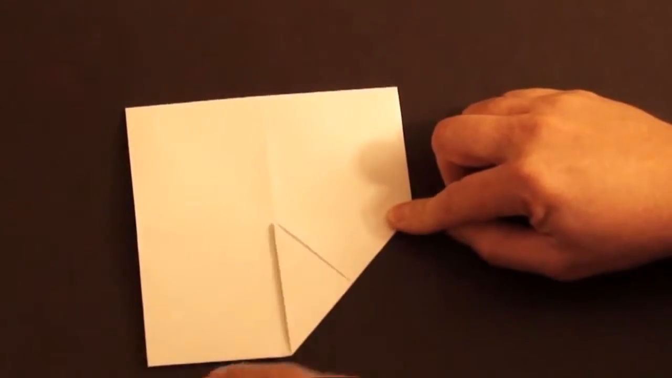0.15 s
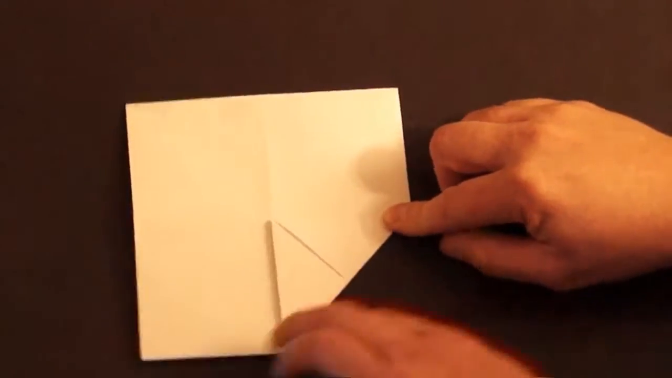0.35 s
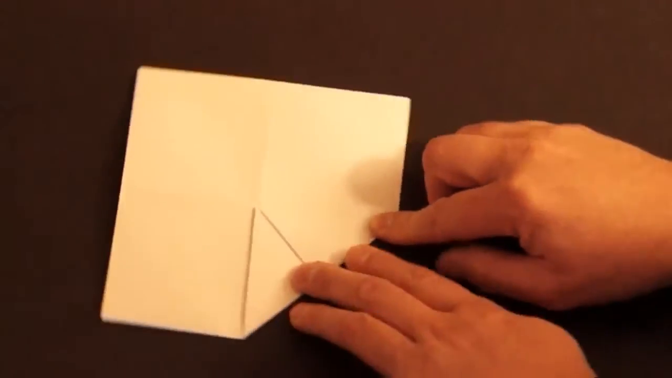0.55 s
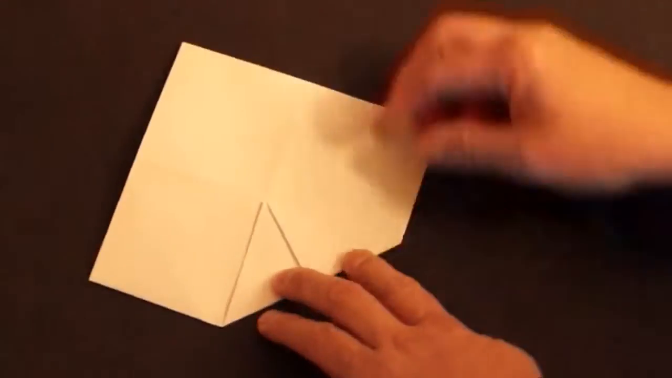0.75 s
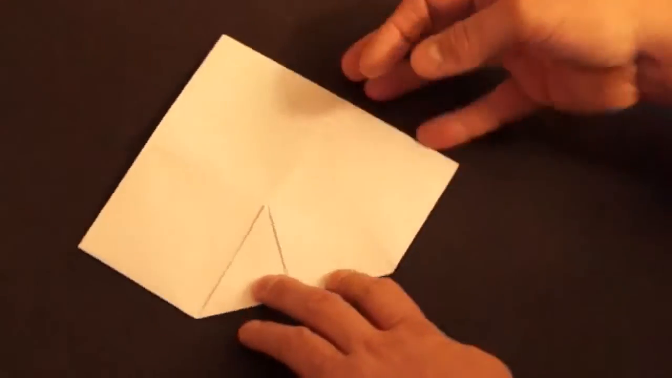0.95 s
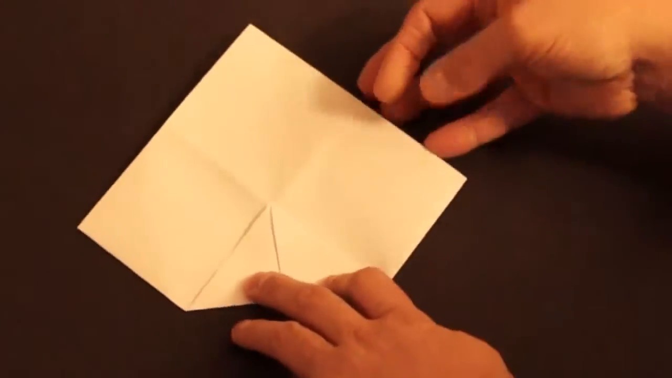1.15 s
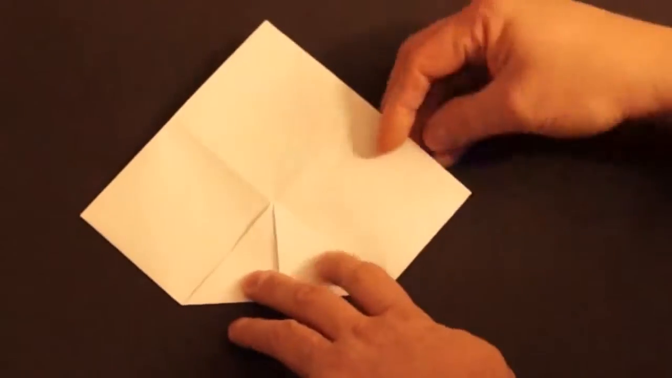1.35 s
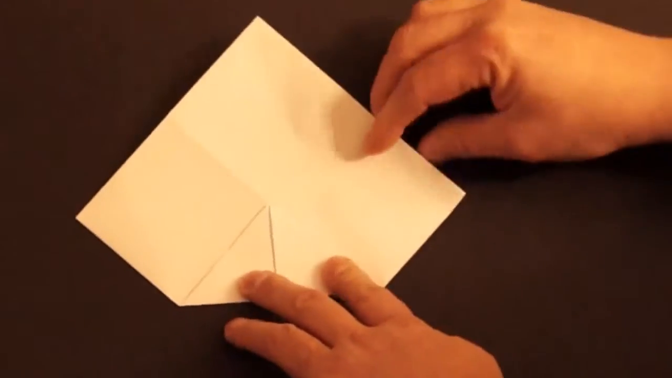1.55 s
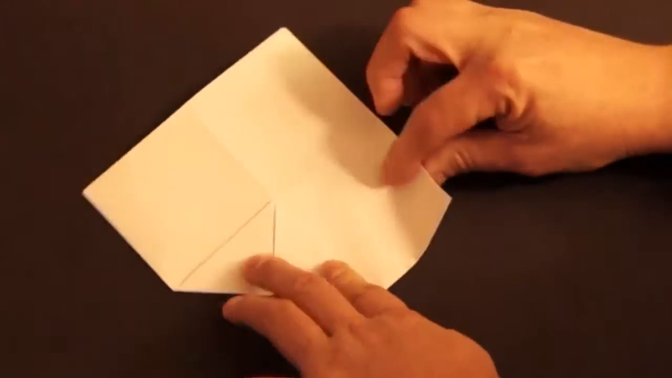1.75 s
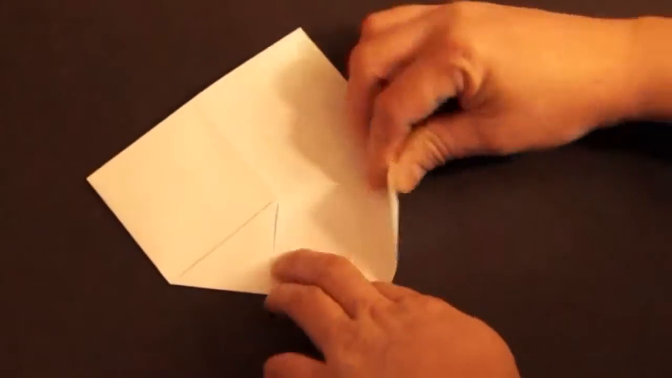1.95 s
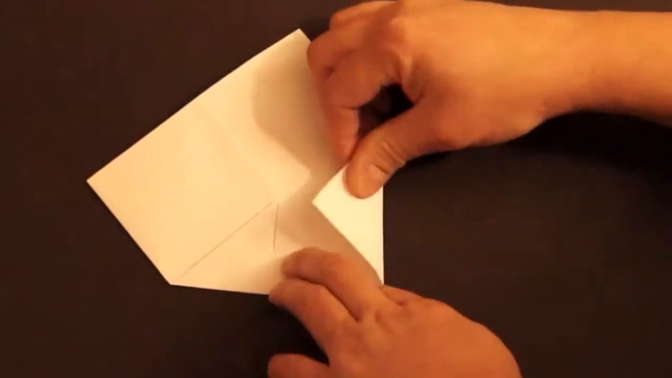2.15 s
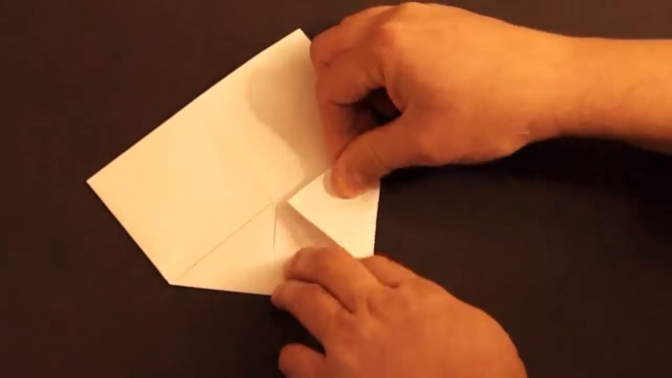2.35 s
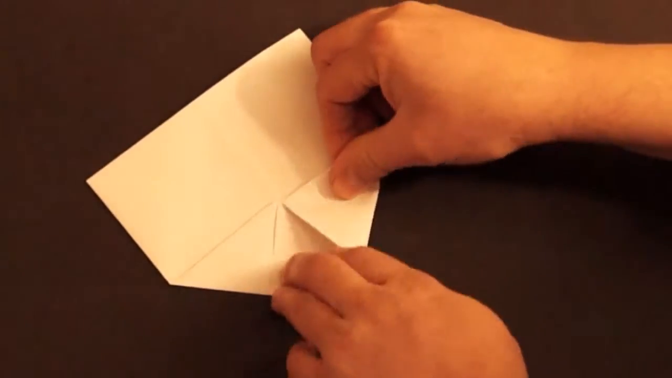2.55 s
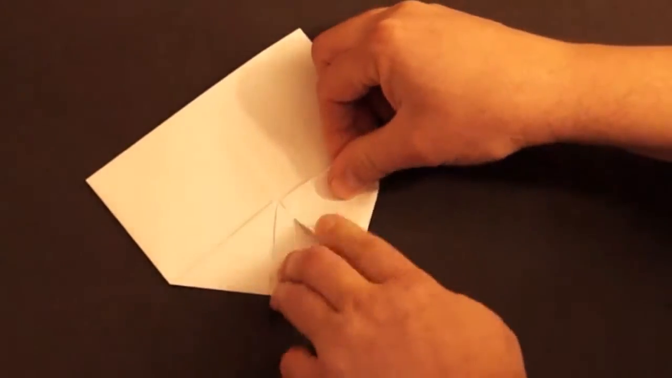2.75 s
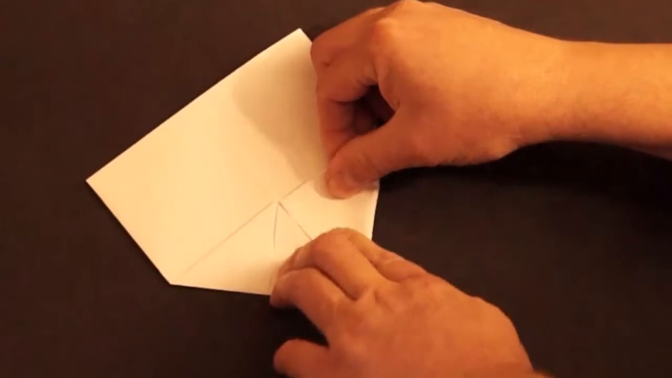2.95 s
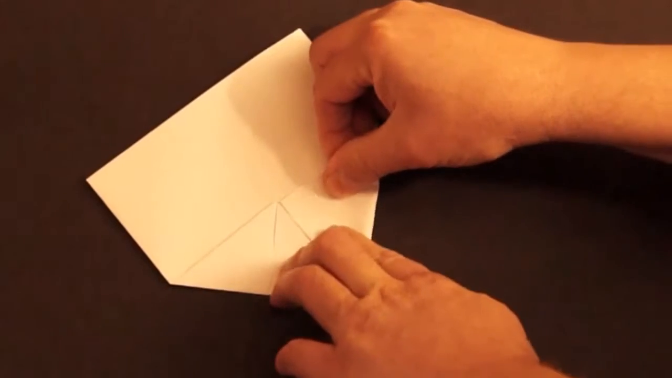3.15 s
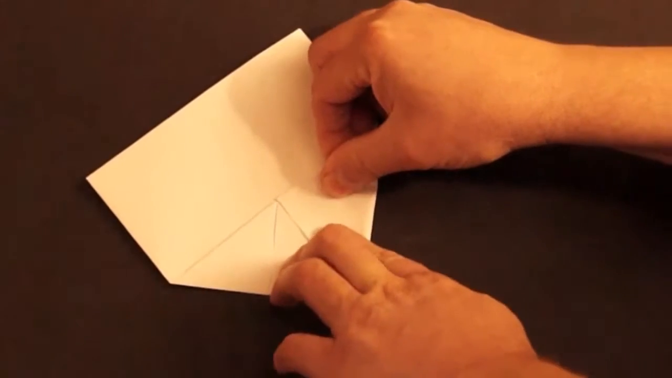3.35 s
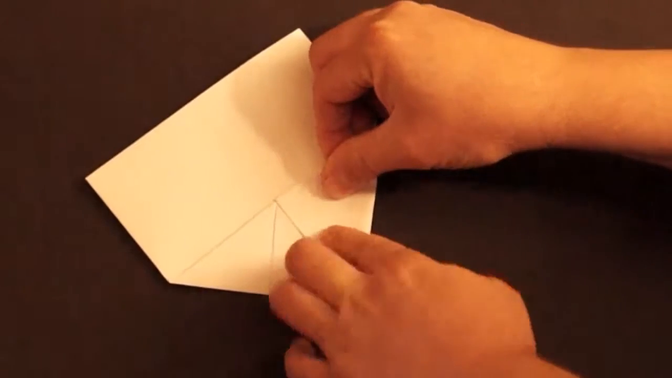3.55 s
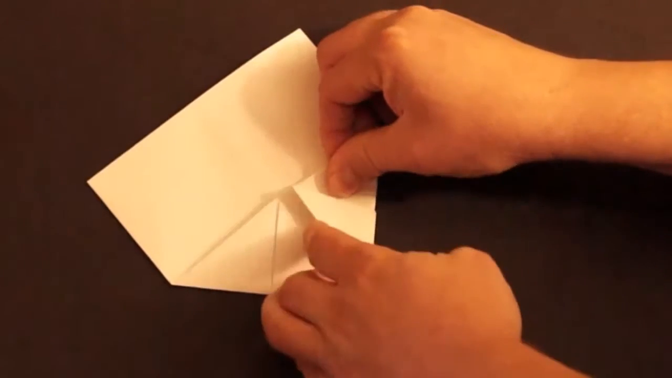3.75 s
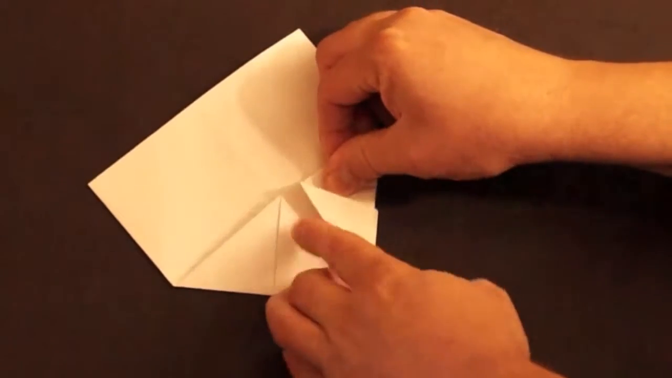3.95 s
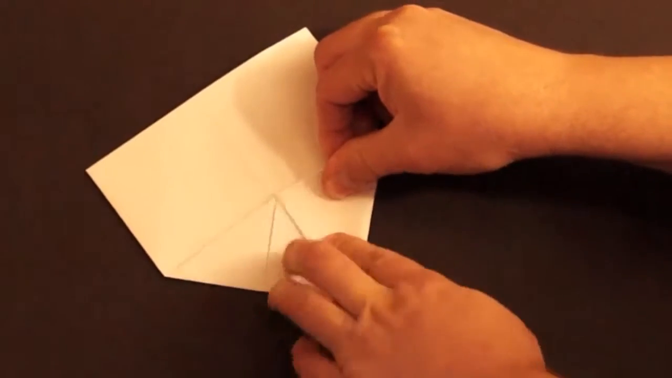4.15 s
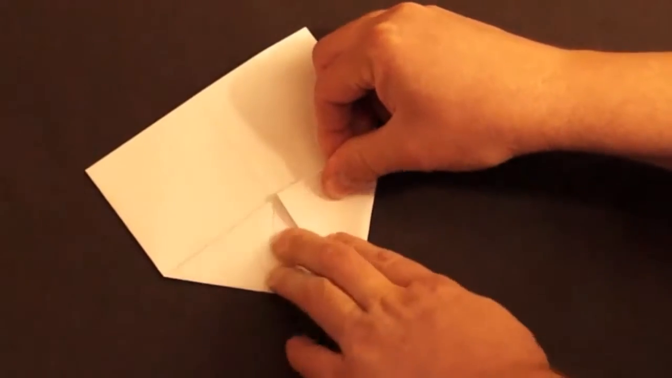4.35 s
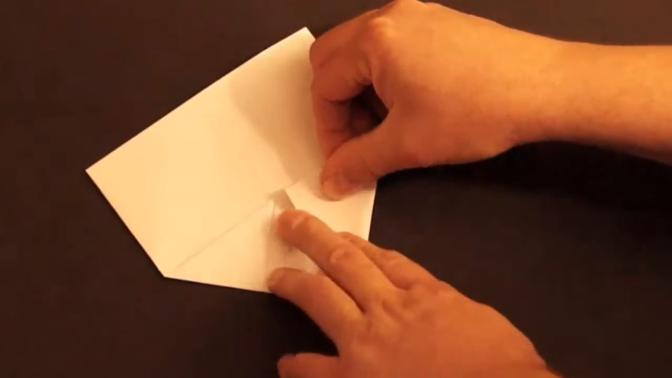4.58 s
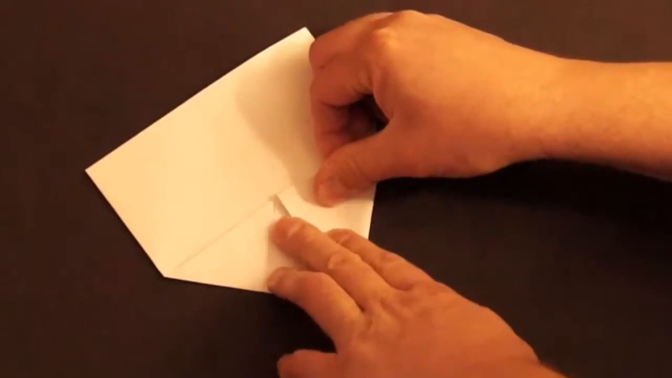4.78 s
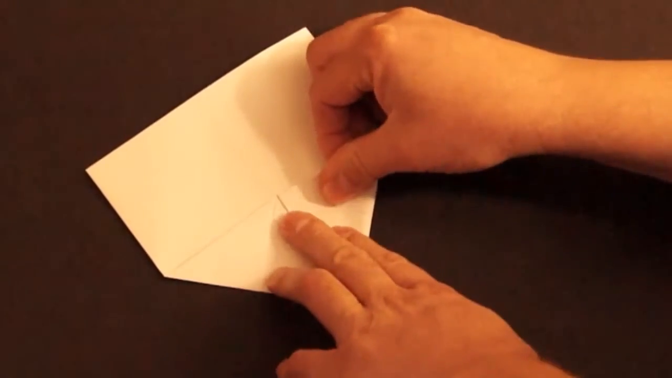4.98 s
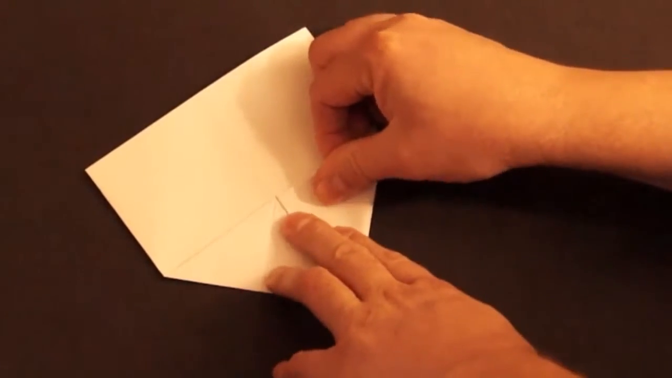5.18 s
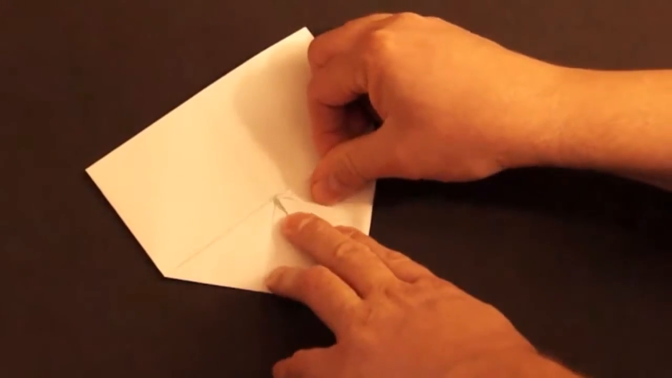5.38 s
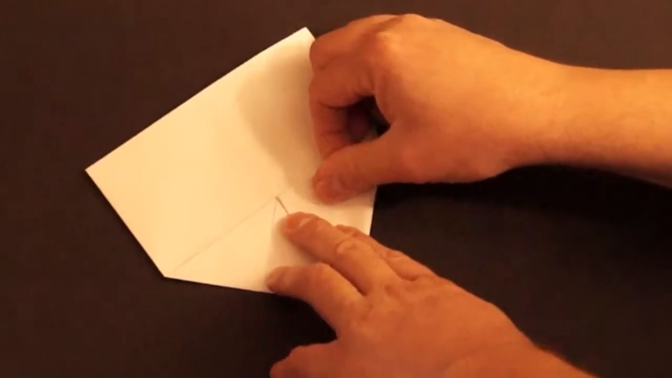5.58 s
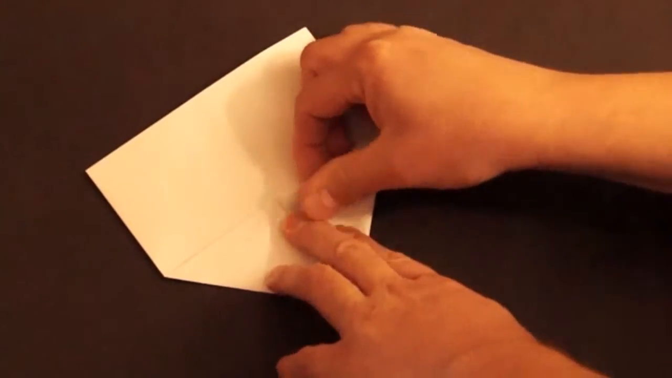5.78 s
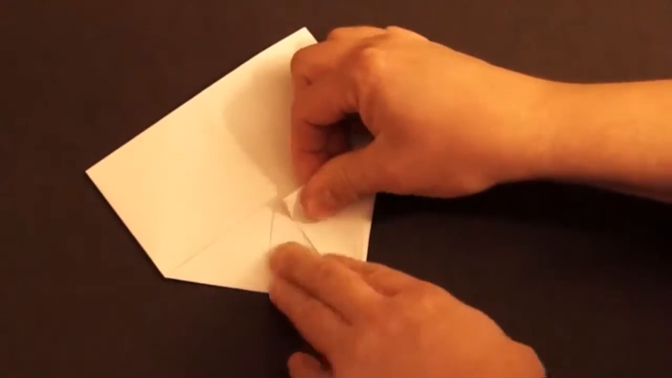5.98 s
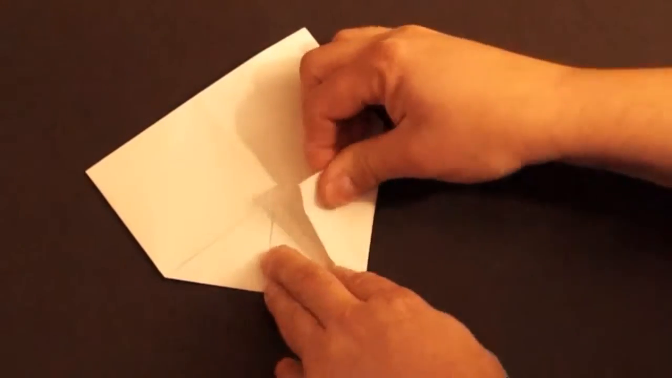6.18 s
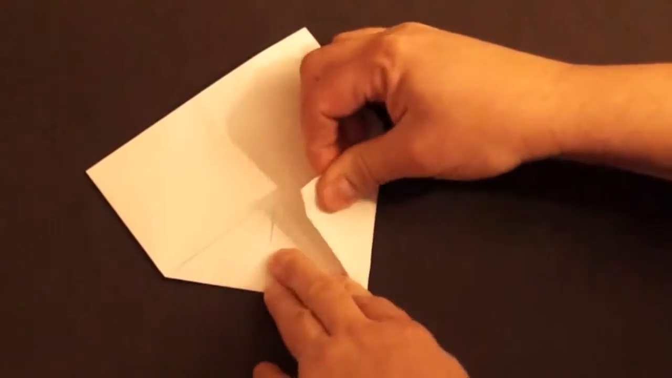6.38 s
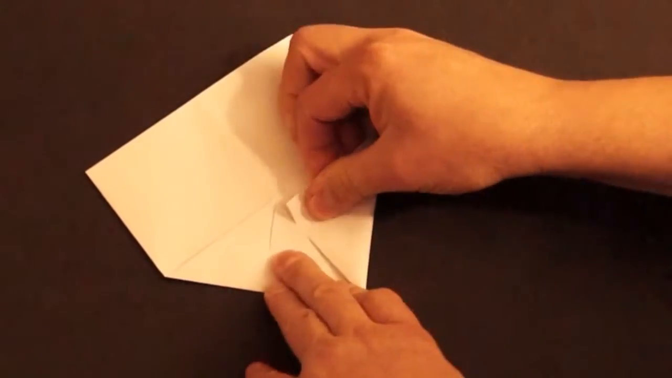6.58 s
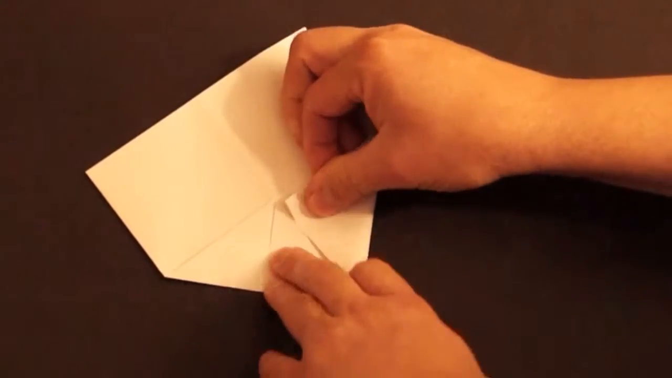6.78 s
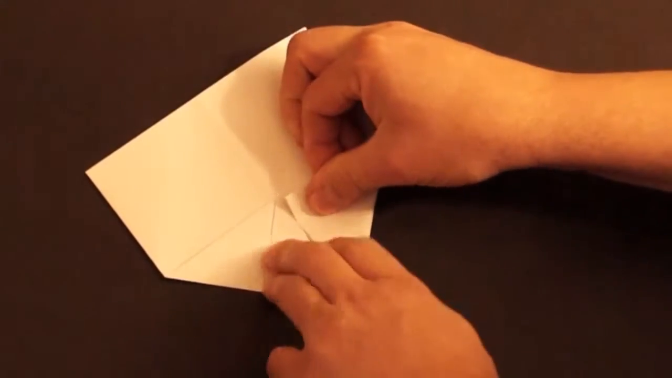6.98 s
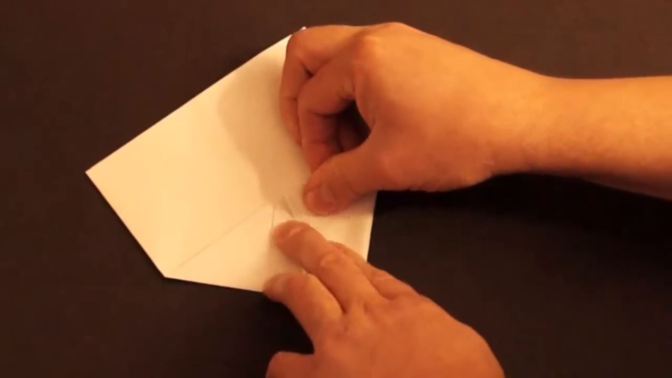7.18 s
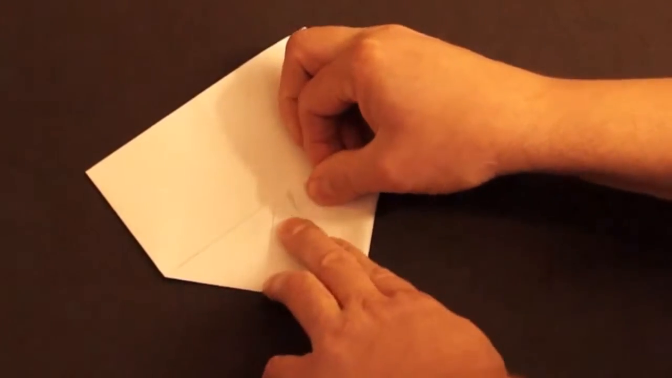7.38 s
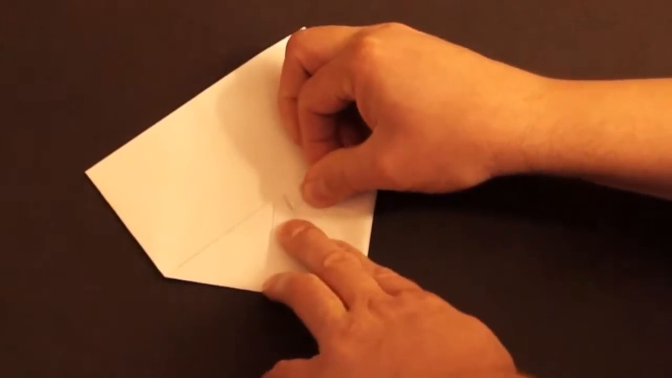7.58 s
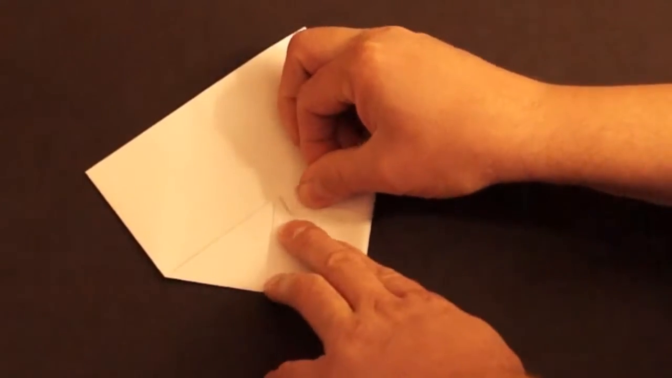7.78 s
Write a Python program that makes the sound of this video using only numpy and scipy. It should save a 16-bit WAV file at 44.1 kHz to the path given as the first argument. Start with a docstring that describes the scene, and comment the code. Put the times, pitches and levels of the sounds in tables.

```python
"""Folding a sheet of paper on a table

Two hands turn a sheet, fold a flap over and press it flat, close to the listener.
Shaped noise makes the sharp snaps of the buckling sheet, its sliding rustle, a thin squeak and fingertip knocks.
A small quiet room answers with an echo and a short tail, over soft hiss, a low drone and a faint buzz."""
import sys
import numpy as np
from scipy import signal
from scipy.fft import rfft, irfft, next_fast_len
from scipy.io import wavfile
from scipy.ndimage import uniform_filter1d

SR = 44100
rng = np.random.default_rng(int(sys.argv[2]) if len(sys.argv) > 2 else 0)


def log_audio(samples):
    """Write samples as a 16-bit WAV file to the path given in sys.argv[1]."""
    # one column per channel
    frames = np.atleast_2d(samples).T
    # limit to full scale, then quantise
    limited = np.clip(frames, -1, 1)
    pcm = np.round(limited * 32767).astype(np.int16)
    wavfile.write(sys.argv[1], SR, pcm)


N = 345303  # length of the scene in samples

# resonances of the folded sheet: (frequency [Hz], width [Hz], lift [dB])
SHEET = [(1424, 430, 4.5), (2150, 200, 1.5), (3024, 160, 2.5), (3400, 260, 2), (4370, 560, 3),
         (6650, 1280, 3), (7130, 490, 0.5), (10640, 860, 3)]


def amp(db):
    """Turns decibels into a plain factor."""
    return 10 ** (np.asarray(db) / 20)


def unit(x):
    """Scales a sound to an rms level of one."""
    return x / np.sqrt(np.mean(x ** 2) + 1e-20)


def read(points, hz):
    """Reads a curve joined by straight lines on a log-frequency axis."""
    f, value = np.transpose(points)
    return np.interp(np.log(hz + 1), np.log(f + 1), value)


def add(mix, s, sound):
    """Adds a sound to the mix from time s in seconds, cut off at the end of the mix."""
    start = max(round(s * SR), 0)
    part = mix[start:][:len(sound)]
    part += sound[:len(part)]


def tint(x, points):
    """Filters a long sound by a spectrum in dB."""
    size = next_fast_len(len(x))
    gain = amp(read(points, np.fft.rfftfreq(size, 1 / SR)))
    return irfft(rfft(x, size) * gain, size)[:len(x)]


def causal(db):
    """Makes the impulse response that rings only after the blow and has these gains."""
    log_gain = np.log(amp(np.r_[db, db[-2:0:-1]]))
    return np.fft.ifft(np.exp(np.conj(signal.hilbert(log_gain)))).real


def lift_db(resonances, hz):
    """Adds up the peaks and hollows that a list of resonances gives."""
    return sum(db / (1 + (2 * (hz - f) / width) ** 2) for f, width, db in resonances)


def slant_db(tilt_db, arch_db, hz, pivot_hz=2500, range_hz=(350, 9000)):
    """Tilt turns the colour brighter about the pivot; arch takes away both bass and treble."""
    octaves = np.log2(np.clip(hz, *range_hz) / pivot_hz)  # levels off outside the range
    return tilt_db * octaves - arch_db * octaves ** 2


def stereo(mid, side):
    """Makes two ears from what they share (mid) and what sets them apart (side)."""
    return np.array([mid + side, mid - side])


def hum(lines, waver=0.56):
    """Steady tones whose phase wanders slowly; waver is the spread of the wander in radians."""
    t = np.arange(N) / SR
    knots = np.arange(0, t[-1] + 1, .5)
    total = np.zeros(N)
    for hz, db in lines:
        wander = np.interp(t, knots, waver * rng.standard_normal(len(knots)))
        phase = wander + 2 * np.pi * rng.random()
        total += np.sqrt(2) * amp(db) * np.sin(2 * np.pi * hz * t + phase)
    return total


def background(air_db=-55.5, side_db=-1.0):
    """Room air and microphone hiss are coloured noise, with a low drone and a faint buzz."""
    # colour of the still room and the hiss: (frequency [Hz], relative level [dB])
    still = [(20, -16), (32, -1), (55, -9.5), (85, -4.5), (125, -1.5), (220, 0), (330, -7.5), (520, -9),
             (750, -12), (1100, -18), (2200, -22), (3100, -20.5), (5500, -24.5), (14500, -28)]
    # stereo width of that noise, before the side_db trim: (frequency [Hz], side gain [dB])
    still_side = [(60, 5.5), (110, -1), (200, 3), (370, 7), (690, 5.5), (1260, 5.5), (2320, 4), (4270, -1),
                  (7850, -1), (14400, 1)]
    # drone, alike in both ears: (frequency [Hz], rms level [dB])
    drone = [(42.3, -61.5), (195, -88)]
    # buzz, opposed in the two ears: (frequency [Hz], rms level [dB])
    buzz = [(135, -69), (165, -52.5), (195, -74), (225, -84), (345, -64), (375, -72), (435, -65.5)]
    air_mid, air_side = (amp(air_db) * unit(tint(rng.standard_normal(N), still)) for _ in range(2))
    mid = air_mid + hum(drone)
    side = amp(side_db) * tint(air_side, still_side) + hum(buzz)
    return stereo(mid, side)


def room(x, wet_db=-4, echo_s=.0108, echo_db=-13, onset_s=0.00017, half_turns_per_s=3.1, count=6, size=16384):
    """One clear echo from a near wall, and a short diffuse tail that keeps changing."""
    # time for the tail to fall by 60 dB: (frequency [Hz], decay time [s])
    room_t60 = [(150, 0.37), (400, 0.14), (1000, 0.23), (3000, 0.17), (7500, 0.14), (13000, 0.08)]
    # stereo width of the tail: (frequency [Hz], side gain [dB])
    room_side = [(60, 0), (200, -21), (400, -2), (800, -5), (2500, -4), (8000, -4.5), (14000, 5)]
    mid, side = np.zeros((2, N))
    add(mid, echo_s, amp(echo_db) * x)
    for k in range(count):
        # each pair of tails trades places at constant power; later pairs do so faster
        turn = half_turns_per_s * np.arange(N) / SR * (1 + k // 2) + k / 2
        weight = np.sqrt(2 / count) * np.cos(np.pi * turn)
        # a tail is noise that dies away at its own pace in each frequency band
        hz, t, bands = signal.stft(rng.standard_normal((2, size)), SR, nperseg=128)
        decay = amp(-60 * t / read(room_t60, hz)[:, None])
        tails = signal.istft(bands * decay, SR, nperseg=128)[1]
        tails = tails * (1 - np.exp(-np.arange(tails.shape[1]) / SR / onset_s))
        tails = amp(wet_db) * tails / np.linalg.norm(tails[0])
        wet = signal.oaconvolve((x * weight)[None], tails, axes=1)
        mid, side = mid + wet[0, :N], side + wet[1, :N]
    return stereo(mid, tint(side, room_side))


def bumps(rise_s=0.0023, fall_s=0.014, breadth=1.38, level_db=-4, size=6000):
    """A soft fingertip gives the table a short dull knock: a swell of noise without a clear pitch."""
    # fingertips land on the table: (time [s], level before the level_db trim [dB], centre [Hz])
    landings = [(.091, -40.5, 190), (.143, -38.5, 198), (1.347, -44, 131), (1.935, -47, 140),
                (2.727, -40, 189), (3.572, -41.5, 155), (3.795, -36.5, 280), (4.602, -42.5, 146),
                (5.724, -45, 130), (5.915, -43, 140), (6.584, -41.5, 142), (7.384, -40.5, 145)]
    t, out = np.arange(size) / SR, np.zeros(N)
    swell = (1 - np.exp(-t / rise_s)) * np.exp(-t / fall_s)
    for s, db, hz in landings:
        band = signal.butter(2, [hz / breadth, hz * breadth], "band", fs=SR, output="sos")
        # the first half of the noise only lets the filter settle
        noise = signal.sosfilt(band, rng.standard_normal(2 * size))[size:]
        add(out, s, amp(db + level_db) * unit(swell * noise) / unit(swell).max())
    return out


def squeak(pitch_hz=10780, width_hz=380):
    """A dragging fingertip sticks and slips fast and unevenly: narrow noise gives a fuzzy high whistle."""
    # loudness of the squeak, silent outside these times: (time [s], rms level [dB])
    squeak_level = [(.14, -62), (.16, -53), (.2, -55), (.225, -46.5), (.275, -59), (.3, -74)]
    band = signal.butter(2, [pitch_hz - width_hz / 2, pitch_hz + width_hz / 2], "band", fs=SR, output="sos")
    level = np.interp(np.arange(N) / SR, *np.transpose(squeak_level), left=-np.inf, right=-np.inf)
    return amp(level) * unit(signal.sosfilt(band, rng.standard_normal(N)))


def friction(grains_per_s=1500, spread_db=3.0, smooth=0.46):
    """Countless fibres catch and let go: a fine hiss with larger grains; smooth is the hiss's energy share."""
    size = amp(spread_db * np.minimum(rng.exponential(1, N), 5))
    happens = rng.random(N) < grains_per_s / SR
    grains = size * happens * rng.choice([-1, 1], N)
    return np.sqrt(smooth) * unit(rng.standard_normal(N)) + np.sqrt(1 - smooth) * unit(grains)


def strokes(push_power=0.99, ease_power=1.62, lowest_hz=900):
    """Each stroke speeds up and slows to rest; its friction grows with the speed."""
    # paper slides on table and skin: (start [s], speeding up [s], slowing down [s],
    # level before colouring [dB], tilt [dB/octave], arch [dB/octave squared])
    slides = [(0.002, 0.016, 0.107, -62, 0, -2.3), (0.111, 0.091, 0.13, -41.5, 0.7, -0.3),
              (0.389, 0.026, 0.16, -41.5, 1.8, 1.3), (0.501, 0.177, 0.058, -39, 2.6, 0.5),
              (0.694, 0.16, 0.15, -40.0, 2.5, 0.8), (0.918, 0.15, 0.083, -43, 1.0, -0.1),
              (1.125, 0.14, 0.2, -45.5, 0.3, 0.2), (1.385, 0.094, 0.273, -40.0, 2, 0.5),
              (1.629, 0.032, 0.064, -37, 1.1, 1.8), (1.679, 0.12, 0.14, -39.0, 1.3, 0.5),
              (1.889, 0.033, 0.19, -43.5, 0, -0.7), (2.056, 0.086, 0.057, -48, 0.8, 0),
              (2.176, 0.031, 0.14, -48, 0, 0.2), (2.338, 0.057, 0.03, -51.5, 2, 1),
              (2.418, 0.024, 0.14, -40.5, 3, 0.2), (2.57, 0.042, 0.048, -41.5, -0.2, 0.1),
              (2.685, 0.036, 0.31, -48, -1, -0.5), (2.906, 0.04, 0.15, -46.5, 2, 0),
              (3.149, 0.12, 0.048, -50.5, 0.4, 1.5), (3.345, 0.04, 0.036, -55.0, -3, 1.5),
              (3.509, 0.046, 0.18, -34.5, -1.1, 1.05), (3.75, 0.054, 0.069, -34.5, -0.3, 0.5),
              (3.858, 0.056, 0.044, -42.5, 1.2, 0.1), (3.981, 0.18, 0.11, -37.5, 0.5, 0.7),
              (4.248, 0.051, 0.061, -55, 1.5, -1.0), (4.498, 0.15, 0.021, -49.5, 1.0, -1),
              (4.651, 0.029, 0.118, -48.5, 2.1, 0.7), (4.774, 0.024, 0.077, -51.5, -4.2, -1.1),
              (4.841, 0.128, 0.107, -54, 2.0, 0), (5.365, 0.058, 0.064, -50.0, 1.4, 0.7),
              (5.532, 0.043, 0.081, -48.5, 2.5, 3.5), (5.649, 0.14, 0.19, -43.5, 1.5, 0.5),
              (5.888, 0.094, 0.17, -46.0, 1.3, -1.0), (6.087, 0.2, 0.202, -47, -2.2, -1.6),
              (6.429, 0.097, 0.12, -38.5, 3, 3), (6.568, 0.023, 0.2, -51.5, 1.6, 0.2),
              (6.775, 0.026, 0.051, -46.5, -3.5, -1.2), (6.877, 0.021, 0.12, -46.5, 0.2, -0.3),
              (6.985, 0.2, 0.18, -46.5, 2.1, -0.3), (7.349, 0.038, 0.12, -43, 0, 0.9),
              (7.53, 0.034, 0.121, -54, 1.3, 1.5), (7.628, 0.083, 0.062, -51.5, -1.5, 0),
              (7.777, 0.02, 0.044, -50.5, -4, 2.5)]
    fibres, out = friction(), np.zeros(N)
    hz = np.fft.rfftfreq(512, 1 / SR)
    for s, rise_s, fall_s, db, tilt_db, arch_db in slides:
        start = max(round(s * SR), 0)
        grain = fibres[start:][:round((rise_s + fall_s) * SR)]
        t = np.arange(len(grain)) / SR
        progress = np.interp(t, [0, rise_s, rise_s + fall_s], [0, .5, 1])
        speed = abs(np.sin(np.pi * progress))
        loudness = speed ** np.where(t < rise_s, push_power, ease_power)
        # the slant stays flat below lowest_hz
        colour = db + slant_db(tilt_db, arch_db, np.maximum(hz, lowest_hz))
        add(out, s, signal.fftconvolve(grain * loudness, causal(colour)))
    return out


def rustle(judder_db=1.52, judder_hz=70, level_db=-1, resting_db=-66):
    """Friction noise follows the strokes, judders with the fingers' grip and passes through the sheet."""
    # colour of sliding: (frequency [Hz], gain [dB])
    rub_colour = [(40, -20.5), (130, 2.5), (220, 1), (420, -3), (900, -3.5), (2000, -3.5), (3600, 0),
                  (5300, -3), (9000, -1), (12000, -6.5), (15000, -24.5)]
    # stereo width of the rustle: (frequency [Hz], side gain [dB])
    rub_side = [(60, 4), (200, 1), (400, -4), (700, -9), (1300, -11), (4300, -11), (8000, -14),
                (14000, -13)]
    low_pass = signal.butter(2, judder_hz, fs=SR, output="sos")
    judder = unit(signal.sosfilt(low_pass, rng.standard_normal(N)))
    hz = np.fft.rfftfreq(2048, 1 / SR)
    body = causal(lift_db(SHEET, hz) + read(rub_colour, hz))
    pair = []  # what both ears share, and what sets them apart
    for _ in range(2):
        sliding = strokes() + amp(resting_db) * friction()  # resting fingers never lie quite still
        pair.append(signal.oaconvolve(sliding * amp(level_db + judder_db * judder), body)[:N])
    return pair[0], tint(pair[1], rub_side)


def snaps(crack_s=0.00068, flutter_s=0.009, flutter_db=-3, crinkle_db=4, lead_s=0.01, lead_db=-18.5,
          bend_q=4, hollow=0.54, size=2048):
    """The sheet pops through in a crack, then flutters unevenly to rest."""
    # the sheet buckles or slaps: (time [s], strength before colouring [dB], tilt [dB/octave],
    # arch [dB/octave squared], energy share of the crack [0-1], ring of the bend [Hz], lift of that ring [dB])
    buckles = [(0.0915, -1.5, -3.5, 1.5, 0.4, 1510, 4), (0.1432, -0.5, -4.5, 1.9, 0.16, 1475, 4.5),
               (0.8011, -13, -0.2, 0.4, 0.3, 730, 7), (1.343, -13, 1, 2.0, 0.06, 4450, 2),
               (1.424, -5.0, -3.9, 3.1, 0.4, 2400, 1), (1.5423, 3, -0.7, 4, 0.2, 420, 11),
               (1.565, 0.5, -2.5, 2.3, 0.9, 3020, 9.5), (1.725, -3.5, -0.5, 3.5, 0.7, 756, 12),
               (1.7692, 1.5, 1.5, 2.5, 0, 3040, 4), (1.792, -9.5, 7.0, 3, 0.8, 5600, 9),
               (1.949, 0.5, 1.0, 3.5, 0.6, 3180, 3), (2.0093, -13, -5.5, 1.5, 0.9, 730, -0.5),
               (2.1111, -11, 1, 2, 0.34, 2790, 1), (2.195, -8, -4, 2, 0.08, 1250, 3.5),
               (2.3424, -16.5, -3.5, 0.2, 0.4, 3250, 6), (2.4487, 5.0, 11, 5.5, 0.66, 1190, 10.5),
               (2.7272, -4, -1, -0.1, 0.9, 890, 6), (2.799, -11.5, -3, 1, 0.32, 1140, 6),
               (2.8803, -6.5, -7, 3.5, 0.92, 3250, 12), (2.9412, 2, 3.5, 2, 0.53, 3250, 6),
               (3.003, -15, -0.5, -0.1, 0.55, 760, 6), (3.0255, -7, -0.5, 6, 0.6, 4440, 5),
               (3.479, -12.5, -0.5, 4.5, 0.77, 3230, 3), (3.796, -0.5, -1.1, -0.1, 0.26, 590, 9),
               (3.8455, -12, -8.5, 3.5, 1, 1420, 1), (3.9568, 1.0, -5, 4.5, 0.95, 4340, 7.5),
               (4.0866, 1.5, -0.5, 3.5, 0.6, 3930, 4), (4.0909, -3, -2, 2, 0.4, 740, 5),
               (4.128, 0, -0.9, 0.5, 0.46, 905, 7.5), (4.2037, -10, -1.6, 2, 0.87, 400, 4),
               (4.4421, -22.5, -13, 6.4, 0.92, 1760, 4), (4.4718, -23.0, -1.5, 4.8, 0.92, 3230, 3),
               (4.6042, -13.5, -1, -0.6, 0.13, 4300, -4), (5.0095, -16.5, 0.5, 2.5, 0.9, 2550, 3.5),
               (5.047, -13, -4.5, 3.5, 0.3, 540, 4), (5.307, -17, 7.5, 7, 0.77, 3460, 11),
               (5.366, -17, 9, 6, 0.8, 3430, 10.5), (5.701, -4.5, -3.5, 7, 1, 2950, 6),
               (5.914, 5.5, -0.9, 1.1, 0.1, 2730, 9), (6.0793, -20, 1.0, -1.3, 0.1, 4300, 0),
               (6.3221, -3, -0.1, 0.5, 0.98, 2980, 2), (6.422, -3, -5.5, 1.5, 0.68, 2320, 7.5),
               (6.4826, 13.5, -1, 2.5, 1, 2885, 11), (6.587, -12.5, 6.5, 4.4, 0.3, 4300, 0),
               (6.7143, -14.5, 0, 4.6, 0.2, 2600, 6), (6.7633, -17.5, 0.5, 4, 0.5, 3040, 4),
               (6.9065, -6, 2.5, 0.9, 0.8, 720, 10), (7.1106, -5, -0.5, 13, 0.9, 2190, -2),
               (7.1244, -3.5, -2.3, 2.0, 0.73, 3900, 5.5), (7.1765, 6.5, 5, 3, 1, 760, 14),
               (7.4039, -2.5, -1.0, 2.1, 0.64, 3220, 12)]
    # colour of snapping: (frequency [Hz], gain [dB])
    snap_colour = [(40, -11), (150, -9.5), (400, 5), (1000, -1.5), (3000, -1.5), (4400, 0.5), (5400, -2.5),
                   (8000, 3.5), (11500, -1.5), (15000, -20)]
    t, hz, out = np.arange(size) / SR, np.fft.rfftfreq(size, 1 / SR), np.zeros(N)
    half = size // 2  # the crack comes this many samples into the blow
    for s, db, tilt_db, arch_db, share, ring_hz, ring_db in buckles:
        crack_noise, sheet_noise, crinkle_noise = rng.standard_normal((3, size))
        share = np.clip(share, .02, .98)

        # the crack holds all frequencies about equally, scattered over a few milliseconds
        burst = rfft(np.roll(crack_noise * t * np.exp(-t / crack_s), half))
        brief = np.exp(-((t - t[half] - crack_s) / (4 * crack_s)) ** 2)
        crack = unit(brief * irfft(burst / abs(burst))) / np.sqrt(size)

        # the flutter dies away, roughened by small crinkles
        crinkle = amp(crinkle_db * unit(uniform_filter1d(crinkle_noise, size=45)))
        fade = (1 - np.exp(-t / crack_s)) * np.exp(-t / flutter_s)
        flutter = unit(sheet_noise * crinkle * fade) / np.sqrt(size)

        # a faint noise swells into the crack
        lead = unit(sheet_noise * np.exp(-t / lead_s))[half - 1::-1] / np.sqrt(size)

        blow = np.sqrt(share) * np.pad(crack, (0, half))
        blow[half:] += amp(flutter_db) * np.sqrt(1 - share) * flutter
        blow[:half] += amp(lead_db) * lead

        # a snap rings with the whole sheet and with the bend that gave way;
        # the bend has one broad peak and a hollow at a share of its pitch
        width_hz = ring_hz / bend_q
        bend = [(ring_hz, width_hz, ring_db), (hollow * ring_hz, width_hz, -ring_db)]
        colour = db + slant_db(tilt_db, arch_db, hz) + read(snap_colour, hz) + lift_db([*SHEET, *bend], hz)
        add(out, s - size / 2 / SR, signal.fftconvolve(blow, causal(colour)))
    return out


def scene():
    """Puts paper and fingers in the middle, with the room around them."""
    rub_mid, rub_side = rustle()
    hands = snaps() + rub_mid + squeak() + bumps()
    return background() + room(hands) + stereo(hands, rub_side)


def record(dry, edge_hz=14600, ceiling=.85):
    """The highest treble is dulled and the tallest peaks are rounded off; then the band limit."""
    top = [(20, -1.5), (11500, 0), (12600, -0.5), (13500, -4.0), (14600, -12)]  # (frequency [Hz], gain [dB])
    coloured = np.array([tint(channel, top) for channel in dry])
    rounded = coloured / (1 + (coloured / ceiling) ** 4) ** .25
    low_pass = signal.firwin(511, edge_hz, window=("kaiser", 9), fs=SR)
    return signal.oaconvolve(rounded, low_pass[None], "same")


dry = scene()
out = record(dry)
log_audio(out)
```